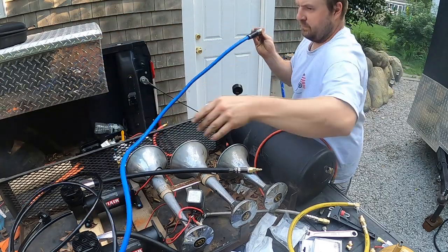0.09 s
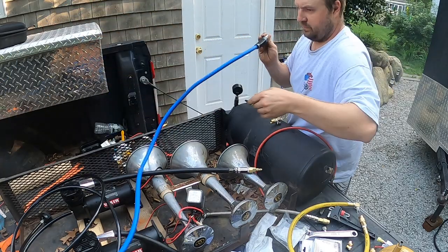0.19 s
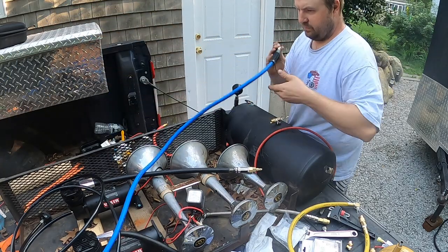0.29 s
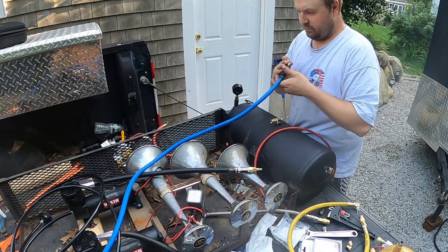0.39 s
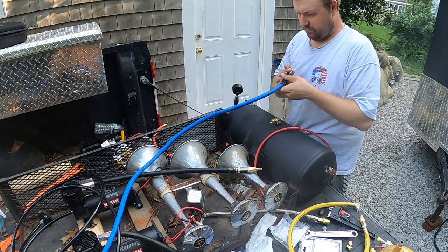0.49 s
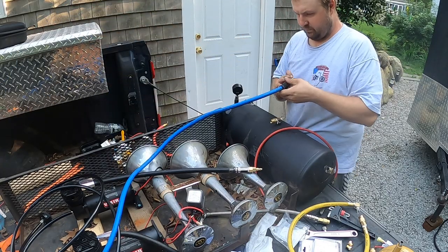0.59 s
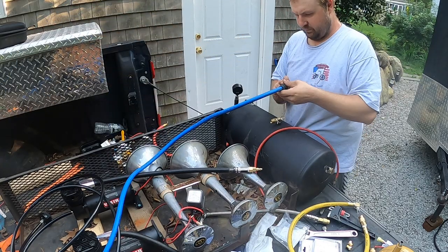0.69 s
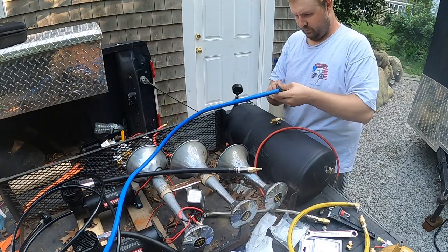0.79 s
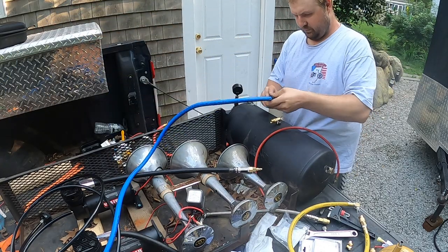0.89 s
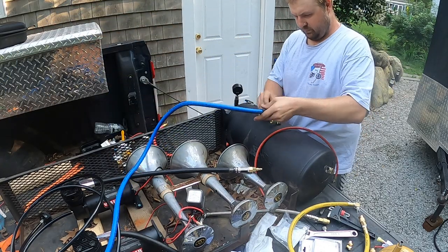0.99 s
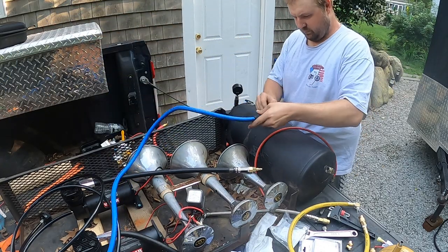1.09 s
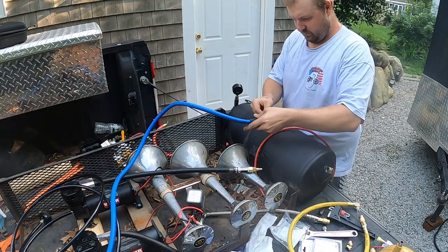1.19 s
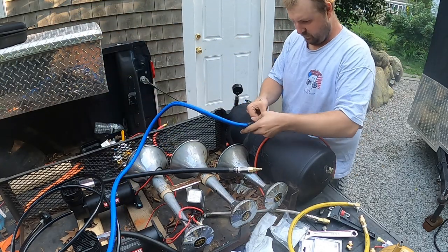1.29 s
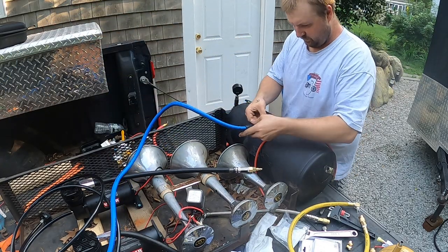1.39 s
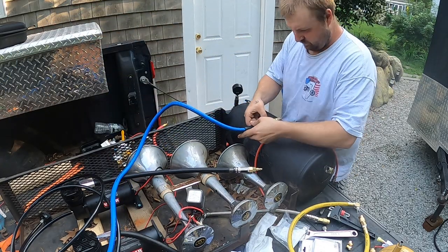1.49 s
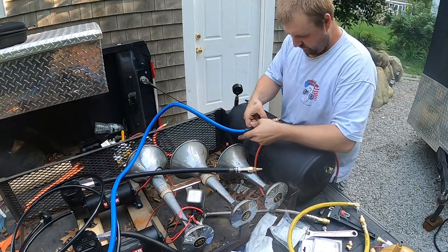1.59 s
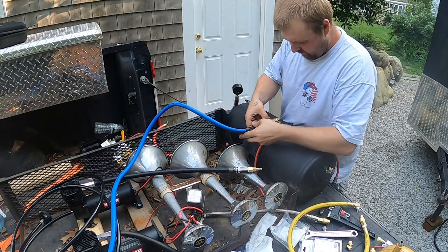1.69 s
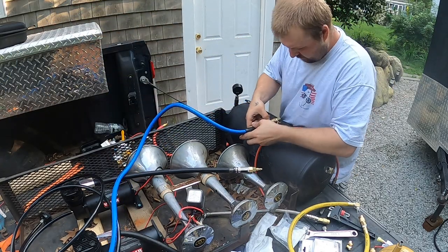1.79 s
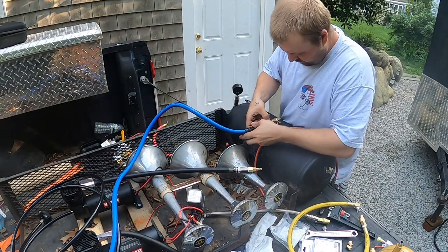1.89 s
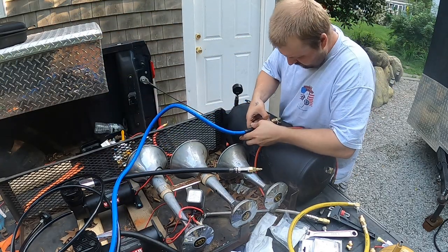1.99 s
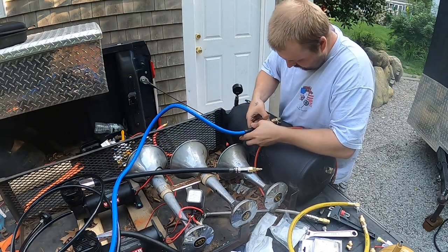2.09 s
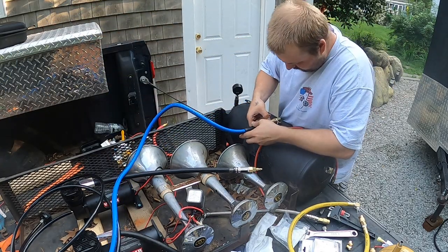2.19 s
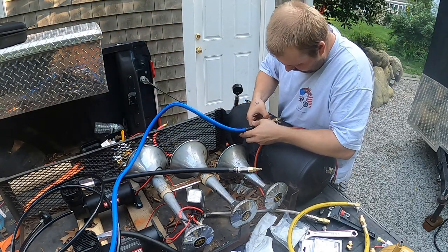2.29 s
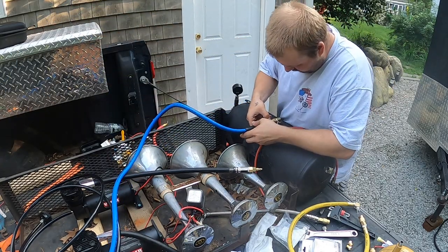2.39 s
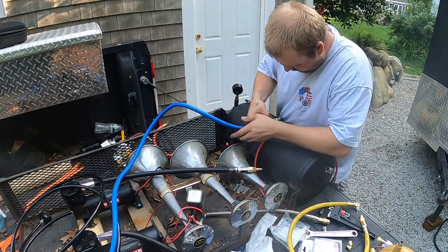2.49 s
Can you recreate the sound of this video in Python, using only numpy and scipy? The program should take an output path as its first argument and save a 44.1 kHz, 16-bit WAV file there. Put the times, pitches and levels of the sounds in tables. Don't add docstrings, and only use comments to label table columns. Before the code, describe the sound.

An air hose clatters over loose metal from 0.2 s, close up, and thumps hard at 0.34 s, with a deep boom and an 80 Hz hum fading mostly on the right. A light rebound ticks at 0.53 s. A brass fitting knocks a steel tank at 1.2 s, a brighter snap rings at 1.9 s, and short scrapes come at 2.27-2.4 s. Faint birds, leaves and machine whine lie behind.

```python
import sys
import numpy as np
from scipy import signal
from scipy.fft import rfft, irfft
from scipy.io import wavfile

SR = 44100
rng = np.random.default_rng(int(sys.argv[2]) if len(sys.argv) > 2 else 0)


def makeup_ratio(level_db):
    decades = np.asarray(level_db, float) / 20
    return 10 ** decades


def unload_wav(signal):
    wavfile.write(
        sys.argv[1],
        SR,
        np.round(np.clip(np.atleast_2d(signal).T, -1, 1) * 32767).astype(np.int16),
    )


N = 110250
T = np.arange(N) / SR
F = np.arange(N // 2 + 1) * SR / N
BANDS = 45 * 2 ** (np.arange(26) / 3)
PER_HZ = 10 * np.log10(BANDS)


def curve(table, hz):
    table = np.array(table, float)
    return np.interp(np.log(hz + 1), np.log(table[:, 0] + 1), table[:, 1])


def over_time(table):
    return np.interp(T, *np.array(table).T)


def band(hz, width):
    x = irfft(rfft(rng.standard_normal(N)) * np.exp(-((F - hz) / width) ** 2), N)
    return x / x.std()


def bell(hz, octaves):
    return -6 * (np.log2(BANDS / hz) / octaves) ** 2


def dull_bell(hz, octaves):
    return bell(hz, octaves) - 9.5 * (BANDS > 4300)


def shares(db):
    p = makeup_ratio(db) ** 2
    return (p / p.sum())[:, None]


def silence():
    return np.zeros((len(BANDS), N))


def noise(power):
    return sum(np.sqrt(p) * band(hz, hz / 6) for hz, p in zip(BANDS, power))


def add_burst(power, start, db, spectrum_db, t60, hold=0.):
    i, j = int(start * SR), min(N, int((start + 1.5 * t60 + hold) * SR))
    t = T[i:j] - start
    fall = -60 * np.clip(t - hold, 0, None) / (t60 * (1000 / BANDS[:, None]) ** .15)
    rise = np.sin(np.pi / 2 * np.clip(t * BANDS[:, None], 0, 1)) ** 4
    power[:, i:j] += shares(spectrum_db) * makeup_ratio(db + fall) ** 2 * rise


def fade(start, t60, hold, rise):
    t = T - start
    attack = np.sin(np.pi / 2 * np.clip(t / rise, 0, 1)) ** 2
    return attack * makeup_ratio(-60 * np.clip(t - hold, 0, None) / np.clip(t60, .005, 9))


def ring(start, modes, db):
    t, out = T - start, 0
    for k, (hz, mode_db, t60) in enumerate(modes):
        beat_hz = 31 * (1 + k % 4 / 2)
        beat_db = 3.5 * (np.cos(2 * np.pi * beat_hz * t) - 1) / 2
        sign = (-1) ** k
        out = out + sign * makeup_ratio(db + mode_db + beat_db) * fade(start, t60, 0, 1 / hz) * np.sin(2 * np.pi * hz * t)
    return out


# (frequency [Hz], level [dB per Hz])
THUMP_COLOUR = [(60, -29.5), (100, 3.5), (260, -5.5), (420, -5), (800, -8), (1500, -6.5), (3900, -26.5),
                (5000, -56), (11000, -83.5), (15000, -110)]
# (frequency [Hz], level [dB], t60 [s])
BENCH_RING = [(156.7, -2, 0.27), (258, -13.5, .13), (345, -2.5, .15), (452.6, -2.5, 0.11), (663, -7, 0.17),
              (790, -1, 0.15), (858, 0, 0.093), (1023, -9, .13), (1405, -8, .1), (1135, -10.5, 0.22),
              (1945, -7, 0.16)]


def thump():
    start, db = .3428, -15
    power, colour = silence(), curve(THUMP_COLOUR, BANDS)
    add_burst(power, start, db, colour + PER_HZ, 0.046, hold=0.015)
    add_burst(power, start, db - 10, colour + 0.26 * PER_HZ, 0.59)
    add_burst(power, start, -14, bell(2000, 0.53) - 9.5 * (BANDS > 4300), 0.03)
    add_burst(power, start, -67.5, bell(6000, 0.64), 2)
    return noise(power) + ring(start, BENCH_RING, -19.5)


# (time [s], level [dB], centre [Hz], t60 [s], bright tick [dB])
RATTLE_HITS = [(.199, -24, 3600, .05, -42), (.204, -29, 3000, .04, -30.5), (.2098, -18.5, 3360, .07, -25),
               (0.215, -23.5, 1300, .07, -39.5), (0.223, -21, 2000, .05, -35),
               (0.227, -14, 1920, .05, -49.5), (.238, -18, 1190, .07, -51), (0.2562, -27.5, 3000, .05, -38),
               (0.2592, -28.5, 1500, .04, -45.5), (.285, -36.5, 2500, .03, -52),
               (.2936, -28, 3000, .04, -39.5), (0.2985, -33, 2500, .06, -40.5),
               (0.328, -34.5, 3500, .05, -44.5), (.427, -49.5, 1003, .05, -73.5),
               (.44, -33.5, 400, .1, -87), (.454, -50, 3980, .05, -73), (.527, -40, 2220, 0.09, -64),
               (.975, -64, 3000, .06, -89)]
# (frequency [Hz], level [dB], t60 [s])
REBOUND_RING = (.527, -44, [(1863, 2, .09), (2440, -3.5, 0.073), (2950, -6, .07), (3600, -4, 0.073)])


def rattle():
    power = silence()
    for start, db, hz, t60, tick_db in RATTLE_HITS:
        add_burst(power, start, db, dull_bell(hz, 1.26), t60)
        add_burst(power, start, tick_db, bell(9000, 1.3), 0.018)
    start, db, modes = REBOUND_RING
    return noise(power) + ring(start, modes, db)


# (frequency [Hz], level [dB per Hz])
HOSE_DRAG = (.2, .142, -26.5, -3, [(100, 4), (250, -3.5), (700, -4.5), (2000, -13.5), (3800, -20),
             (4700, -32), (9000, -40.5), (15000, -50.5)])


def drag():
    start, length, db, fall_db, colour = HOSE_DRAG
    u = (T - start) / length
    pressure = makeup_ratio(db + fall_db * u + 1.9 * band(0, 63)) ** 2 * (u < 1)
    rise = np.clip(u * BANDS[:, None] / 60, 0, 1) ** 2
    return noise(shares(curve(colour, BANDS) + PER_HZ) * pressure * rise)


# (time [s], peak [dB], length [s])
BENCH_BUMPS = [
    (0.259, -21, .012),
    (.3205, -15.5, 0.0059),
    (1.255, -31, 0.01),
    (2.336, -37.5, 0.0066),
]


def bumps():
    return sum(makeup_ratio(db) * np.sin(np.pi * np.clip((T - start) / length, 0, 1)) ** 2
               for start, db, length in BENCH_BUMPS)


# time [s], level [dB], spectrum (frequency [Hz], level [dB per Hz]),
# ring (frequency [Hz], level [dB], t60 [s]), ring level [dB], crack t60 [s]
TANK_KNOCK = (1.206, -33.5, [(100, -0.5), (271, -8), (420, -8.5), (692, -19), (2300, -13), (3120, -13),
              (13000, -51.5)], [(246.5, -1, 0.38), (309, -16, 0.38), (374, -12, 0.35), (434, -16, 0.3),
              (820, -13, 0.23), (1227, -21.5, .3), (1667, -1, 0.19), (1945, -3.5, 0.084), (2390, -15, 0.12),
              (2670, -2.5, 0.11), (3160, 0, 0.096), (3410, -13, 0.25), (3822, -11, 0.13), (4800, -20, .08)],
              -34, 0.17)
COUPLER_SNAP = (1.908, -28.5, [(150, -14.5), (300, -28.5), (1480, -10), (2000, -16), (3200, -7),
                (3740, 1.5), (4400, -7.5), (13000, -63)], [(668, -18, 0.19), (1333, -11.5, 0.17),
                (1627, -11.5, 0.2), (2270, -10.5, 0.19), (2560, -10.5, 0.11), (2030, -19, 0.32),
                (2920, -14, .11), (3200, -7, 0.19), (3246, -18, 0.45), (3700, -15, 0.18), (3810, 0, 0.085),
                (4080, -9, .12), (4290, -14.5, .19), (5350, -22.5, .15)], -27.5, 0.16)
# (frequency [Hz], level [dB], t60 [s])
SNAP_CONTACT = [(3800, -2, 0.012)]


def fittings():
    power, out = silence(), ring(1.9095, SNAP_CONTACT, -16)
    for start, db, colour, modes, ring_db, t60 in (TANK_KNOCK, COUPLER_SNAP):
        spectrum_db = curve(colour, BANDS) + PER_HZ
        add_burst(power, start, db, spectrum_db, t60)
        add_burst(power, start, db - 11.5, spectrum_db, 0.42)
        out = out + ring(start, modes, ring_db)
    return out + noise(power)


# (time [s], level [dB], length [s], centre [Hz], width [octaves])
SCRAPE_STROKES = [(2.024, -58, 0.088, 1370, 0.29), (2.272, -60, .012, 3400, .8),
                  (1.9, -38, 0.02, 1750, .45), (2.282, -43, .022, 4200, .3),
                  (2.301, -38, 0.024, 1460, 1.44), (2.334, -48, 0.024, 3100, .12),
                  (2.322, -49, .025, 1000, .8), (2.362, -43, 0.025, 1300, .4), (2.362, -48, .02, 3500, .4),
                  (2.382, -56, .03, 1600, 1.2), (2.3, -58, .06, 3400, .15)]
# (frequency [Hz], level [dB], t60 [s])
COUPLER_MODES = [(659, 0.5, 0.12), (1040, -18, .03), (1330, 1, 0.09), (1622, -5, 0.12), (1800, -3, 0.072),
                 (2390, -6.5, 0.048), (2867, -1, 0.049), (3214, 0, 0.043), (3570, -4.5, 0.044),
                 (3970, -11, 0.047), (4356, -16, 0.041), (6100, -22, .03)]


def coupler():
    slips_per_s, hiss_db, squeak_db, grit_db = 3080, -2, 4, -12
    slips = (rng.random(N) < slips_per_s / SR) * rng.standard_normal(N) * np.sqrt(SR / slips_per_s)
    slips = slips + makeup_ratio(hiss_db) * rng.standard_normal(N)
    strokes = [np.sin(np.pi * np.clip((T - start) / length, 0, 1) ** 0.57) ** 1.44
               for start, _, length, _, _ in SCRAPE_STROKES]
    out = 0
    for hz, mode_db, t60 in COUPLER_MODES:
        push = sum(makeup_ratio(db - 5.6 * (np.log2(hz / mid_hz) / octaves) ** 2) * stroke
                   for stroke, (_, db, _, mid_hz, octaves) in zip(strokes, SCRAPE_STROKES))
        r, turn = 1000 ** (-1 / (t60 * SR)), 2 * np.pi * hz / SR
        squeak = makeup_ratio(squeak_db) * np.sqrt(1 - r) * np.sin(2 * np.pi * hz * T)
        rung = signal.lfilter([1], [1, -2 * r * np.cos(turn), r * r], push * (slips + squeak))
        out = out + makeup_ratio(mode_db) * np.sqrt(1 - r) * np.sin(turn) * rung
        out = out + makeup_ratio(mode_db + grit_db) * push * band(hz, hz / 8)
    return signal.sosfilt(signal.butter(4, [400, 6200], "band", fs=SR, output="sos"), out)


# (time [s], length [s], level [dB], centre [Hz])
HANDLING = [
    (0.0028, 0.037, -54.5, 1170),
    (.075, 0.062, -57.5, 1200),
    (0, 0.2, -63.5, 4000),
    (0.00083, .035, -70, 7400),
    (.128, .008, -70, 8200),
    (.04, .14, -76, 8500),
    (1.55, .9, -84, 10000),
]


def rustle():
    power = silence()
    for start, length, db, hz in HANDLING:
        add_burst(power, start, db, dull_bell(hz, 0.36), .06, hold=length)
    return noise(power)


# (time [s], frequency [Hz], peak [dB], rise [s], t60 [s], left over right [dB])
STAND_BOOMS = [
    (.3585, 82, -10.5, 0.009, .17, 2),
    (.352, 124, -26, 0.0027, 0.32, -1.5),
    (.406, 81, -10, 0.013, 1.77, -18.5),
    (1.215, 108, -34, .01, 0.72, -2),
    (.232, 65, -24.5, .01, 0.36, -3.5),
    (2.4, 115, -46, 0.0089, 0.21, -3),
]
# (time [s], level [dB])
STAND_SWAY = [(0, -47), (.2, -77), (.33, -36), (.7, -32), (1.1, -40), (1.35, -33), (1.6, -48), (2.5, -56.5)]


def stand():
    def pan(db):
        return makeup_ratio(np.array([[db], [0]]))

    out = 0
    for start, hz, db, rise, t60, pan_db in STAND_BOOMS:
        hum = fade(start, t60, rise, rise) * np.sin(2 * np.pi * hz * (T - start))
        out = out + pan(pan_db) * makeup_ratio(db) * hum
    sway = np.array([band(31.7, 9.9), band(31.7, 9.9)])
    return out + sway * pan(-13) * makeup_ratio(over_time(STAND_SWAY) + 2.5)


# (time [s], length [s], from [Hz], to [Hz], level [dB])
BIRD_CALLS = [
    (-.006, .036, 2950, 4000, -54),
    (.084, .046, 2850, 4000, -53),
    (1.45, .19, 8550, 8300, -77),
    (1.5, .11, 8650, 8550, -86),
    (1.55, .09, 8000, 7800, -85),
    (1.63, .14, 8350, 8300, -83),
]


def birds():
    calls = 0
    for start, length, from_hz, to_hz, db in BIRD_CALLS:
        u = np.clip((T - start) / length, 0, 1)
        hz = (from_hz + (to_hz - from_hz) * u ** 1.6) * (1 + .003 * band(0, 60))
        flutter_db = (1 + 2 * (from_hz > 7000)) * band(0, 40)
        tone = np.sin(2 * np.pi * np.cumsum(hz) / SR)
        calls = calls + makeup_ratio(db + flutter_db) * np.sin(np.pi * u) ** .4 * tone
    tail = rng.standard_normal(4000) * makeup_ratio(-60 * np.arange(4000) / SR / 0.1)
    return calls + makeup_ratio(-6.5) * signal.fftconvolve(calls, tail / np.linalg.norm(tail))[:N]


# (frequency [Hz], width [Hz], level [dB], steady share [0-1])
FAR_LINES = [
    (970, 30, -79, 0.97),
    (1938, 25, -77.5, 1),
    (5020, 490, -74.5, 0.079),
]
# (time [s], level [dB])
MACHINE_LOAD = [(0, -1), (.7, -0.5), (1.1, -4.5), (1.3, 3), (1.5, 0.5), (1.65, 4.5), (1.8, 1.5), (2.3, 4.5),
                (2.5, 7.5)]


def machine_and_insects():
    mid, side = 0, 0
    for hz, width, db, steady in FAR_LINES:
        db = db + steady * over_time(MACHINE_LOAD)
        mid = mid + makeup_ratio(db) * (band(hz, width) + 2 * steady * np.sin(2 * np.pi * hz * T))
        side = side + makeup_ratio(db - 2.0) * band(hz, width)
    return np.array([mid, side])


# (time [s], level [dB])
LEAF_STIR = [(0, -66.5), (.6, -69.5), (.8, -90), (1.2, -79.5), (1.4, -72.5), (1.7, -72.5), (2.1, -70),
             (2.5, -70)]


def leaves():
    gusts = makeup_ratio(over_time(LEAF_STIR) + 2.5 * band(0, 12))
    return gusts * np.array([band(3500, 900), band(3500, 900)])


# (frequency [Hz], level [dB per Hz])
YARD_COLOUR = [(40, -1), (90, -9), (300, -25.5), (1100, -28.5), (3000, -39), (5600, -37), (6000, -49),
               (9000, -60), (15000, -87)]
# (time [s], level [dB])
YARD_SWELL = [(0, 0.5), (.9, -4.5), (1.6, -0.5), (2.1, 0), (2.5, 2)]
# (frequency [Hz], likeness [0-1])
PORT_LIKENESS = [(100, 0.52), (290, 0.61), (1000, 0.78), (3100, 0.19), (6800, 0)]


def far_hiss():
    like = np.clip(curve(PORT_LIKENESS, F), 0, .98)
    colour = makeup_ratio(curve(YARD_COLOUR, F)) * (F > 30)
    mid = irfft(rfft(rng.standard_normal(N)) * colour, N)
    side = irfft(rfft(rng.standard_normal(N)) * colour * np.sqrt((1 - like) / (1 + like)), N)
    level = makeup_ratio(-52.5 + over_time(YARD_SWELL) + band(0, 2.6))
    return np.array([mid, side]) * level / mid.std()


def yard():
    mid, side = far_hiss() + leaves() + machine_and_insects()
    mid = mid + birds()
    return np.array([mid + side, mid - side])


# (frequency [Hz], level [dB])
PORT_LEVEL = [(200, -4.5), (700, 0), (2380, 3.5), (4400, 3.5), (8120, -15), (11000, -9), (15000, -5)]
# (frequency [Hz], phase [radians])
PORT_PHASE = [(300, 0), (1400, -.3), (2700, -.7), (4570, -2.1), (6500, -2.5), (10000, -.8), (13000, -.3)]


def ports(x):
    ratio = makeup_ratio(curve(PORT_LEVEL, F)) * np.exp(1j * curve(PORT_PHASE, F))
    right = 2 * rfft(x) / (1 + ratio)
    clutter = rng.standard_normal(900) * makeup_ratio(-60 * np.arange(900) / 900)
    bright = np.diff(x, 2, prepend=[0, 0]) + .3 * x
    side = makeup_ratio(-9) * signal.fftconvolve(bright, clutter / np.linalg.norm(clutter))[:N]
    return np.array([irfft(right * ratio, N) + side, irfft(right, N) - side])


def scene():
    near = thump() + rattle() + drag() + bumps() + fittings() + coupler() + rustle()
    return ports(near) + stand() + yard()


def low_pass(x):
    return signal.sosfilt(signal.butter(12, 15710, fs=SR, output="sos"), x)


def record(dry):
    dry = signal.sosfilt(signal.butter(1, 18, "high", fs=SR, output="sos"), dry)
    dry = signal.sosfilt(signal.butter(12, 14300, fs=SR, output="sos"), dry)
    return low_pass(dry)


dry = scene()
out = record(dry)
unload_wav(out)
```